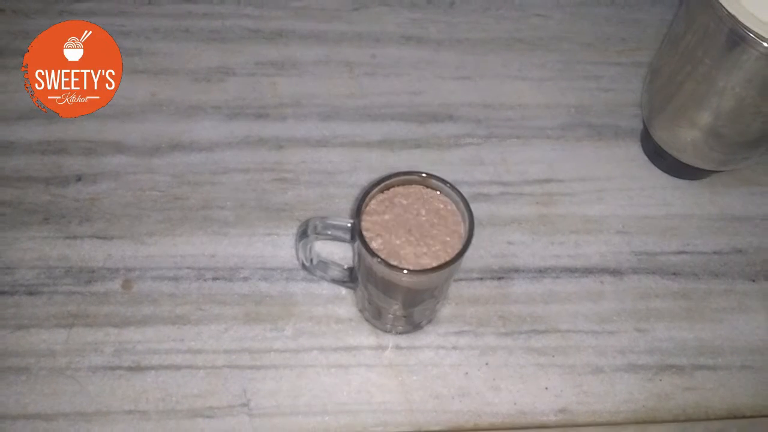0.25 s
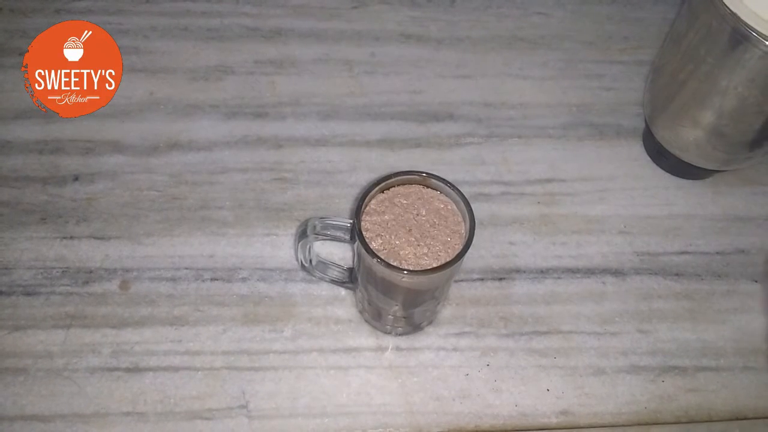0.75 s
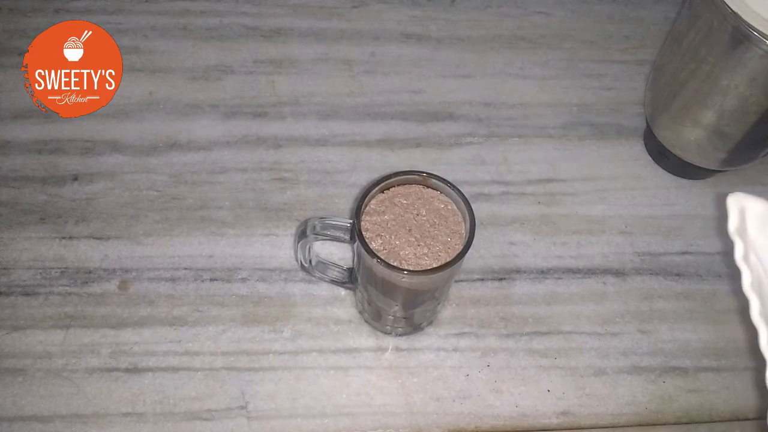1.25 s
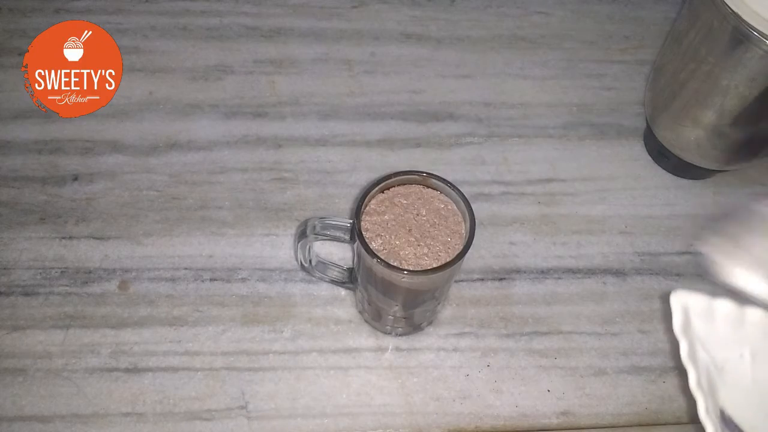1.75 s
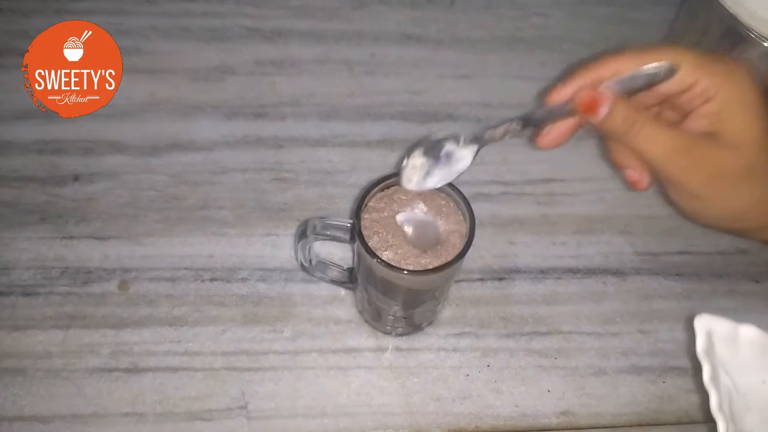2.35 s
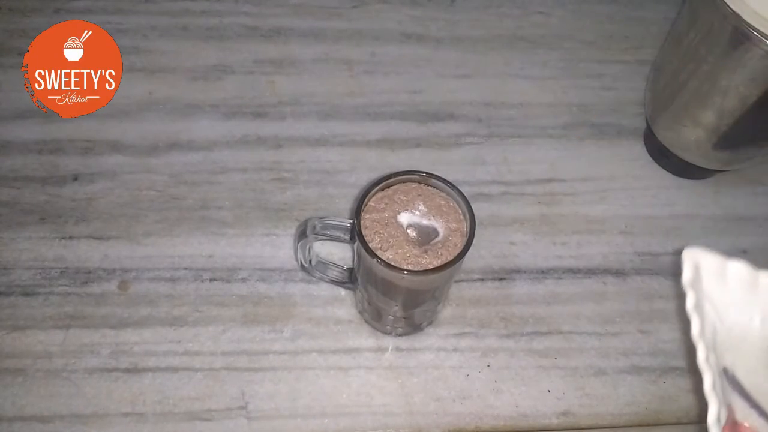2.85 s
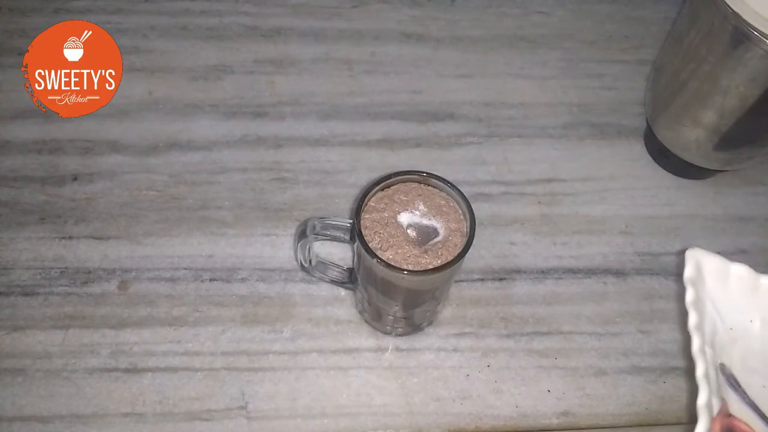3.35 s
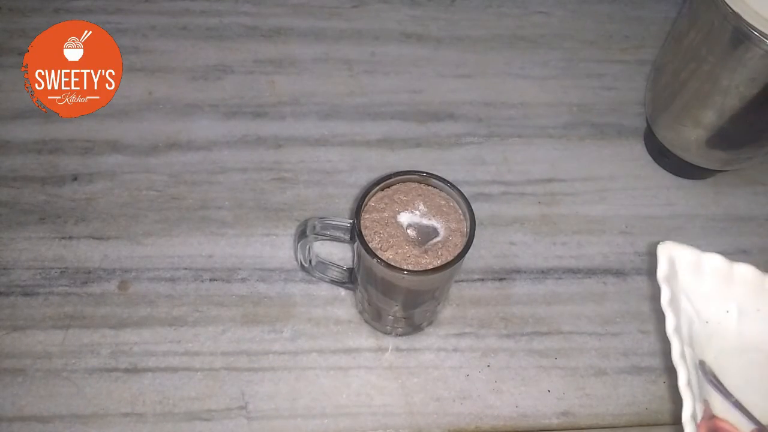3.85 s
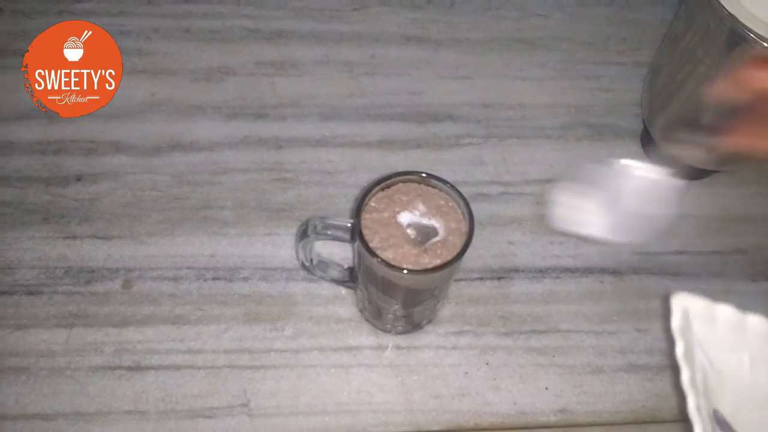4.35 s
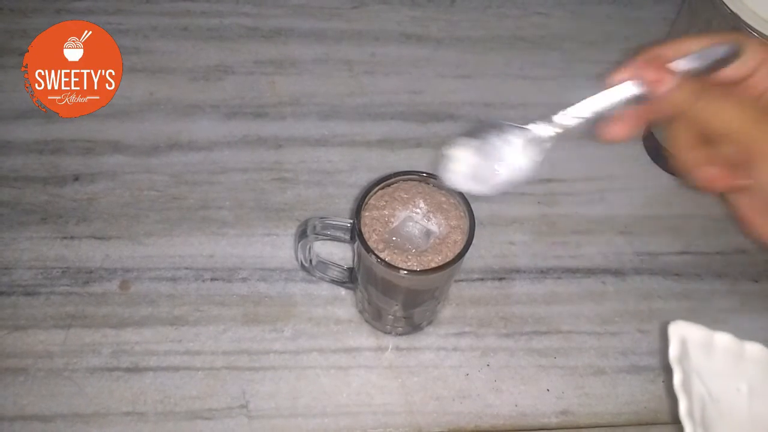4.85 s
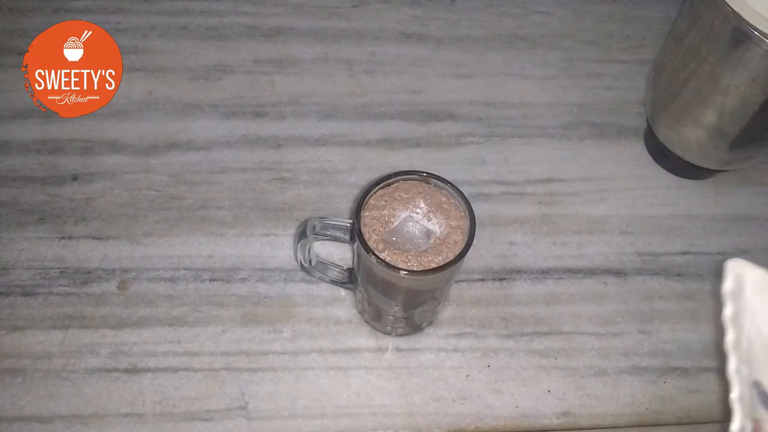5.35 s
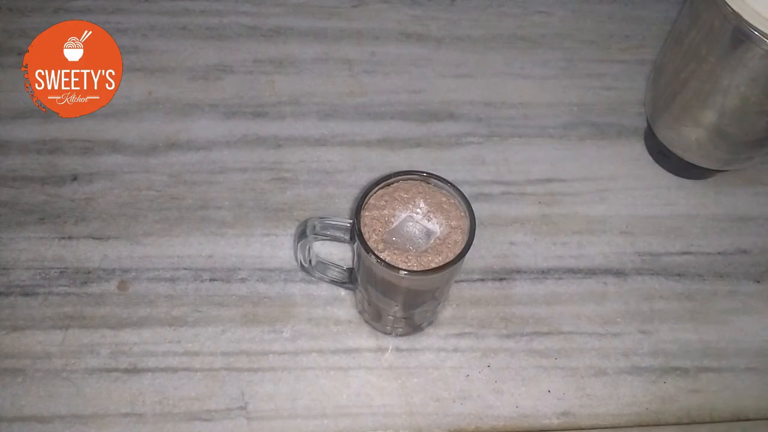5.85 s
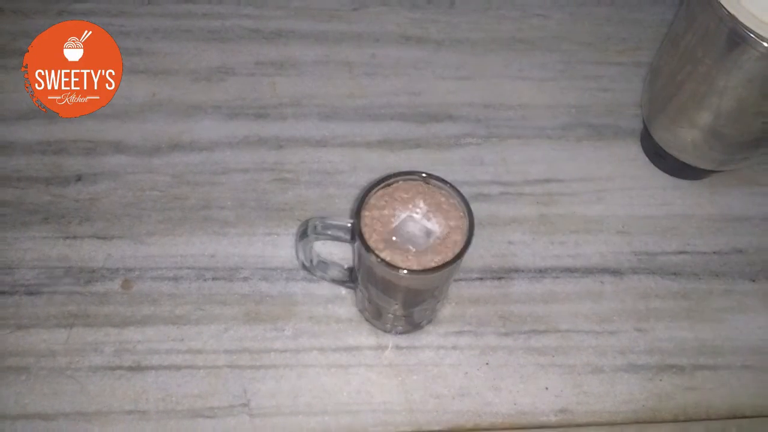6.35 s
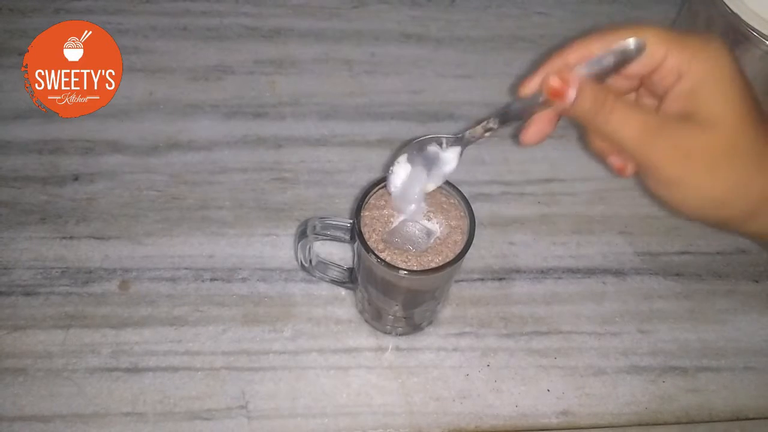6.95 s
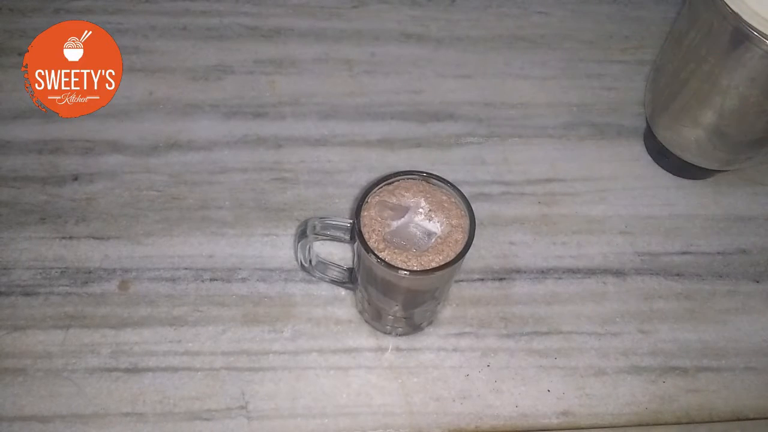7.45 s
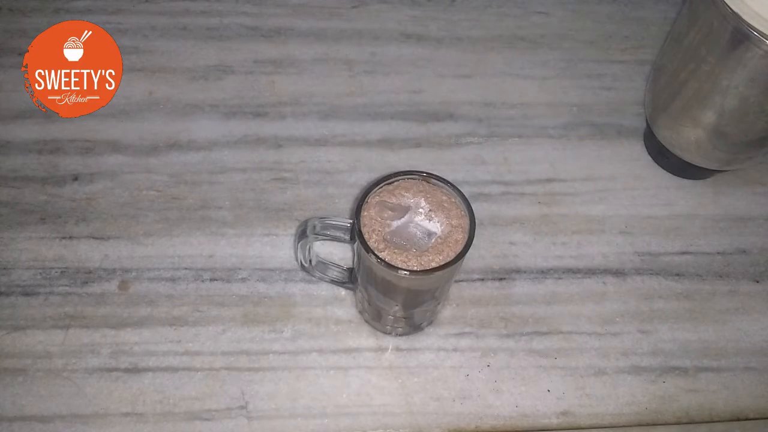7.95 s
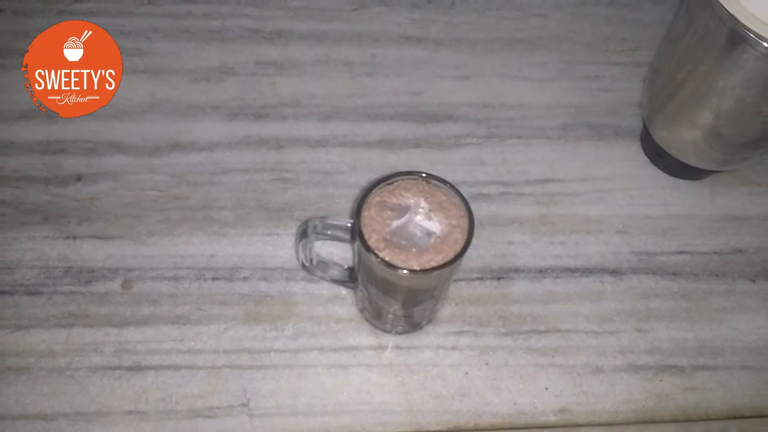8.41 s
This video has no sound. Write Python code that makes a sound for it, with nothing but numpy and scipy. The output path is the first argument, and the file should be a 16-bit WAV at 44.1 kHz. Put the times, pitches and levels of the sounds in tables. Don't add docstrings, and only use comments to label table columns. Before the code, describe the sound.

A quiet kitchen hum with faint hiss and a wavering low motor tone runs throughout. From 0 to about 1.6 s a spoon digs through ice cubes in a hard bowl: dense irregular knocks, bright snaps, grinding and very short bowl rings. Near-quiet follows, with a very soft cube drop at 2.3 s. A second busy dig runs 2.95 to 4.3 s, then a hard, dry crack at 4.63 s as a cube hits the mug, with a small rebound and low rising glug. The third dig, 5.4 to 6.5 s, opens with a strong clack and thins to scattered ticks. A third cube clicks in at 7.0 s with slight fizz. The bowl shifts softly at 7.4, lands with a sharp ringing clack at 7.75, the spoon taps at 8.22, and a rough slide fades toward 8.6 s. Close, wide stereo with a short room tail.

```python
import sys
import numpy as np
from scipy import signal
from scipy.fft import rfft, irfft, next_fast_len
from scipy.io import wavfile

SR = 44100
rng = np.random.default_rng(int(sys.argv[2]) if len(sys.argv) > 2 else 0)


def magnitude_from_level(level_db):
    exponent = np.asarray(level_db, float) / 20
    return 10 ** exponent


def unload_audio(sound):
    columns = np.transpose(np.atleast_2d(sound))
    steps = np.round(np.clip(columns, -1, 1) * 32767)
    wavfile.write(sys.argv[1], SR, steps.astype(np.int16))


N = 382788

EDGES = 30 * 2 ** np.arange(0, 9.2, .5)


def at_hz(points, hz):
    return np.interp(np.log(hz), np.log(np.array(points)[:, 0]), np.array(points)[:, 1])


def in_time(tables):
    t, out = np.arange(N) / SR, -150.
    for rows in tables:
        s, *columns = np.transpose(rows)
        out = np.maximum(out, [np.interp(t, s, c, -150, -150) for c in columns])
    return out


def band(x, low_hz, high_hz):
    return signal.sosfilt(signal.butter(2, [low_hz, min(high_hz, .45 * SR)], "band", fs=SR, output="sos"), x)


def drift(rate):
    knots = rng.standard_normal(400)
    return np.interp(np.arange(N) / SR * rate, np.arange(400), knots)


def shifting(per_s, count):
    weights = np.array([drift(per_s) for _ in range(count)])
    return weights / np.sqrt(np.sum(weights ** 2, axis=0))


def coloured(tone, alike):
    size = next_fast_len(N)
    shared, *own = rng.standard_normal((3, size))
    white = np.sqrt(alike) * shared + np.sqrt(1 - alike) * np.array(own)
    gain = magnitude_from_level(at_hz(tone, np.fft.rfftfreq(size, 1 / SR) + 1))
    out = irfft(rfft(white) * gain, size)[:, :N]
    return out / np.sqrt(np.mean(out ** 2))


def clicks_at(seconds, gains):
    out = np.zeros(N)
    np.add.at(out, np.round(np.asarray(seconds) * SR).astype(int), gains)
    return out


def ring(clicks, hz, t60):
    r, w = magnitude_from_level(-60 / (t60 * SR)), 2 * np.pi * hz / SR
    return signal.lfilter([0, np.sin(w)], [1, -2 * r * np.cos(w), r * r], clicks + 1e-18)


def dying(blows, t60):
    return signal.lfilter([1], [1, -magnitude_from_level(-60 / (t60 * SR))], blows + 1e-18)


def lagged(x, lag_s, tone=((10, 0), (20000, 0)), slant=1):
    size = next_fast_len(N + 64)
    hz = np.fft.rfftfreq(size, 1 / SR)
    turn = np.exp(-2j * np.pi * hz * lag_s) * magnitude_from_level(slant * at_hz(tone, hz + 1))
    return irfft(rfft(x, size) * turn, size)[..., :N]


def small_contacts(per_s, spread_db):
    sizes = magnitude_from_level(spread_db * np.minimum(rng.exponential(1, N), 4)) * rng.choice([-1, 1], N)
    grains = sizes * (rng.random(N) < per_s * magnitude_from_level(5 * drift(30)) / SR)
    return grains / np.sqrt(np.mean(grains ** 2))


def bowl_modes(knock_s, share_db, luck, rubbing):
    # pitch_hz, level_db, t60_s
    modes = [(482.7, -1, 0.11), (809.4, 2, 0.087), (891.3, -0.5, 0.089), (971, -3, 0.095),
             (1112, -2.5, 0.041), (1154.5, 2.5, 0.099), (1280, -4, 0.063), (1600, 3.5, 0.035),
             (1757, 8, 0.037), (1836, 9, 0.057), (2520, 10.5, 0.046), (3460, 6.5, 0.03), (3650, 4, 0.037),
             (3840, 2, 0.016)]
    mode_spread_db, loss_cycles = 4.5, 200
    out = 0
    for k, (hz, level_db, t60) in enumerate(modes):
        blow_db = share_db(hz) - 16.5 + mode_spread_db * luck[:, 20 + k]
        blows = clicks_at(knock_s, magnitude_from_level(blow_db) * np.sign(luck[:, 39 - k]))
        drive = blows + np.roll(rubbing, 37 * k)
        out = out + magnitude_from_level(level_db) * ring(drive, hz, min(t60, loss_cycles / hz))
    return out


def ice_in_bowl():
    # start_s, peak_db, body_share_db, drag (0-1)
    first_dig = [(0.043, -36.5, -33, 0.03), (0.066, -35, -37, 0.94), (0.11, -16.5, -12.5, 0.38),
                 (0.139, -14.5, -23, 0.9), (0.162, -8, -14.5, 0.24), (0.225, -14, -29.5, 0.06),
                 (0.252, -14, -13.5, 0.72), (0.316, -17.5, -5, 0.22), (0.354, -13.5, -25, 0.85),
                 (0.442, -17, -3.5, 0.66), (0.51, -22, -21, 0.14), (0.617, -19, -34.5, 0.45),
                 (0.65, -15, -16, 0.19), (0.679, -26.5, 0.5, 0.43), (0.714, -23, -4.5, 0.84),
                 (0.778, -38.5, 10, 0.3), (0.841, -19.5, -6, 0.7), (0.863, -5, -12, 0.59),
                 (0.943, -15, -1, 0.35), (1.011, -17, -20, 0.42), (1.026, -10.5, -13, 0.02),
                 (1.064, -17.5, -12, 0.3), (1.109, -43, -19, 0.8), (1.209, -20, -13.5, 0.46),
                 (1.253, -22, -12.5, 0.66), (1.291, -16.5, -11.5, 0.75), (1.32, -10.5, -15, 0.2),
                 (1.367, -28, -23, 0.4), (1.504, -27, -17, 0.26), (1.601, -39, -32, 0.27)]
    second_dig = [(2.954, -13.5, -1.5, 0.28), (2.98, -17, -15, 0.65), (3.002, -16, -5.5, 0.25),
                  (3.036, -18, -2.5, 0.083), (3.069, -25.5, 4.5, 0.74), (3.129, -18, -5, 0.14),
                  (3.179, -23, -5, 0.41), (3.214, -20, -4, 0.57), (3.244, -17.5, -3.5, 0.23),
                  (3.263, -19, -16, 0.56), (3.296, -14.5, -8, 0.43), (3.317, -9, -10.5, 0.11),
                  (3.374, -23.5, -4, 0.67), (3.465, -23.5, -3.5, 0.26), (3.473, -15, -8, 0.42),
                  (3.494, -10.5, -16, 0.26), (3.526, -12.5, -10, 0.25), (3.565, -9, -14, 0.44),
                  (3.64, -18.5, -5, 0.31), (3.678, -23.5, -25.5, 0.64), (3.761, -25, -8, 0.26),
                  (3.768, -23.5, -24, 0.7), (3.812, -22, -12.5, 0.64), (3.959, -24, -15, 0.33),
                  (3.988, -11, -10, 0.75), (4.006, -9, -20.5, 0.2), (4.095, -21.5, -9, 0.42),
                  (4.109, -14, -9, 0.12), (4.163, -39, -3, 0.39), (4.466, -21.5, -17, 0.56)]
    third_dig = [(5.374, -14, -10, 0.55), (5.401, -14, -12.5, 0.44), (5.434, -29, -3, 0),
                 (5.4506, -12, -7.5, 0.31), (5.572, -24.5, -7.5, 0.0046), (5.6, -27, -24, 0.7),
                 (5.702, -30, -9, 0.14), (5.724, -26.5, -38, 0.19), (5.745, -22, -32, 0.43),
                 (5.766, -10.5, -21, 0.22), (5.836, -20, -16, 0.43), (5.868, -22, -16, 0.008),
                 (5.897, -26, -26, 0.24), (5.929, -40, -12, 0.3), (5.953, -33.5, -4.5, 0.096),
                 (6.1, -25, -7, 0.89), (6.107, -21, -13.5, 0.22), (6.16, -15.5, -15.5, 0.81),
                 (6.235, -24.5, -7, 0.51), (6.255, -25, -9, 0.66), (6.505, -35, -15, 0.3),
                 (6.536, -28, -13, 0.46), (6.838, -34.5, -7, 0.61), (6.906, -27.5, -16.5, 0.25)]
    put_away = [
        (7.587, -23.5, -12.5, 0.41),
        (7.7447, -9.5, -11.5, 0.44),
        (8.028, -31.5, -11, 0.9),
        (8.085, -41, -1, 0.28),
        (8.117, -35, -26, 0.26),
        (8.225, -18.5, -26, 0.44),
    ]
    further_knocks = [(0.19, -15, -7.5, 0.52), (0.385, -15.5, -5, 0.35), (0.411, -15.5, -5.5, 0.31),
                      (0.885, -17, -5, 0.22), (0.916, -10.5, -11, 0.3), (0.928, -16, -19, 0.24),
                      (0.959, -14.5, -19, 0.26), (1.126, -22.5, -14, 0.22), (1.345, -22.5, -6, 0.17),
                      (1.471, -35, -18, 0.56), (1.714, -41, -9, 0.39), (1.853, -37.5, -9.5, 0.58),
                      (3.105, -17, -11, 0.49), (3.152, -27.5, -1, 0.27), (3.342, -45, -17, 0.34),
                      (3.552, -18.5, -16, 0.48), (3.594, -29, -20, 0.44), (3.848, -27.5, -11, 0.34),
                      (4.051, -32, -1, 0.45), (4.208, -31.5, -0.5, 0.56), (4.288, -38.5, 2.5, 0.59),
                      (6.264, -16.5, -17, 0.28), (6.862, -42, -9, 0.33)]
    # time_s, grinding_db
    pressure = [
        [(0.0, -38.5), (0.144, -39), (0.278, -29.5), (0.31, -33), (0.712, -39), (0.842, -41.5), (1.176, -49.5),
         (1.578, -53), (1.62, -65)],
        [(2.95, -45), (3.004, -37), (3.126, -37), (3.484, -34), (3.644, -43), (3.794, -51), (4.012, -41),
         (4.288, -54), (4.58, -50.5)],
        [(5.46, -42), (5.548, -35), (5.716, -34), (5.91, -43), (6.186, -43.5), (6.342, -51), (6.586, -65),
         (6.932, -49.5), (6.97, -48.5)],
        [(7.75, -34.5), (7.848, -44), (7.962, -50), (8.102, -43.5), (8.3, -46.5)],
    ]
    share_hz = [1176, 3150, 8140]
    # pitch_hz, t60_s
    crack_t60 = [(500, 0.0052), (1500, 0.016), (4000, 0.013), (12000, 0.033)]
    # pitch_hz, level_db (per half octave)
    knock_tone = [(400, -16), (900, -9), (1800, -1.5), (2500, 3.5), (4000, 4.5), (6300, 1), (9500, -8),
                  (12900, -15.5)]
    blow_delay_s, tick_db = .0008, 18
    settle_db, settle_t60_s = -22.5, 0.11
    base_share_db, share_per_body, top_spread_db = [2.5, -18.5, -21], [1, -0.46, -0.17], 1.5

    rows = np.concatenate([first_dig, second_dig, third_dig, put_away, further_knocks])
    rows = rows + [blow_delay_s, 0, 0, 0]
    knock_s, peak_db, body_share_db, drag = rows.T
    drag = np.clip(drag, 0, 1)
    luck = rng.standard_normal((len(rows), 40))

    settling = dying(clicks_at(knock_s, magnitude_from_level(peak_db + settle_db)), settle_t60_s)
    body_db = 20 * np.log10(magnitude_from_level(in_time(pressure)[0] + 2.0) + settling + 1e-8)
    bright_db = -0.1 + 0.85 * body_db
    grains = small_contacts(per_s=1500, spread_db=3.8)
    white = rng.choice([-1., 1.], (2, N))
    stutter = small_contacts(per_s=680, spread_db=-2.5)

    shares = base_share_db + np.outer(body_share_db, share_per_body)
    shares[:, 2] += top_spread_db * luck[:, 19]

    def share_db(hz):
        return peak_db + np.array([at_hz(np.c_[share_hz, share], hz) for share in shares])

    out = 0
    for k, (low, high) in enumerate(zip(EDGES[7:], EDGES[8:])):
        hz = np.sqrt(low * high)
        strength = magnitude_from_level(share_db(hz) + 2.36 * luck[:, k])
        t60 = at_hz(crack_t60, hz)
        crack = dying(clicks_at(knock_s, strength * (1 - drag) ** 2), 0.5 * t60)
        rasp = dying(clicks_at(knock_s, strength * drag * 0.51), 7.73 * t60)
        burst = crack * white[k % 2] + rasp * (0.5 * white[k % 2] + 0.77 * stutter)
        tick = clicks_at(knock_s, strength * (1 - drag) ** 4 * magnitude_from_level(tick_db))
        lift = np.clip(np.log2(hz / 1500) / 0.48, 0, 1)
        grind = magnitude_from_level((1.5 - lift) * body_db + lift * bright_db - 5.0) * grains
        even = np.sqrt(SR / 2 / (high - low))
        gain = (-1) ** k * even * magnitude_from_level(at_hz(knock_tone, hz))
        out = out + gain * band(magnitude_from_level(4.0) * burst + tick + grind, low, high)
    rubbing = magnitude_from_level(body_db - 40.0) * grains
    out = out + bowl_modes(knock_s, share_db, luck, rubbing)
    return band(out, 150, 23000)


def snaps():
    # start_s, peak_db, top_share_db
    edge_snaps = [(0.069, -37, -23), (0.1087, -31, -29), (0.1381, -33, -18), (0.161, -42, -21),
                  (0.2263, -11.5, -30), (0.3157, -33, -17), (0.354, -21, -22), (0.3721, -18, -20),
                  (0.4564, -19, -19), (0.5891, -30, -25), (0.6085, -25, -20), (0.618, -28, -27),
                  (0.6514, -46, -21), (0.8644, -30, -23), (0.8689, -30, -25), (0.9624, -13.5, -32),
                  (1.0116, -27, -19), (1.0264, -8.5, -20), (1.064, -15.5, -25), (1.1104, -18.5, -29),
                  (1.2084, -26, -26), (1.2531, -25, -20), (1.291, -25, -11), (1.321, -8, -24),
                  (1.3678, -16, -35), (2.295, -38, -15), (2.954, -28, -13), (2.9801, -22, -24),
                  (3.0021, -26, -12), (3.0365, -14.5, -15), (3.1053, -46, -30), (3.1278, -29, -25),
                  (3.2186, -26, -16), (3.2434, -11, -25), (3.263, -16.5, -13), (3.2955, -15, -24),
                  (3.3179, -18, -12), (3.373, -25, -31), (3.4745, -28, -16), (3.494, -16.5, -20),
                  (3.5274, -29, -18), (3.5558, -29, -14), (3.5665, -17, -22), (3.6396, -41, -11),
                  (3.64, -17.5, -18), (3.679, -22, -28), (3.7594, -33, -21), (3.7688, -43, -29),
                  (3.7688, -42, -28), (3.8132, -32, -27), (3.9594, -40, -15), (3.992, -26, -19),
                  (4.0078, -20, -20), (4.0971, -38, -22), (4.112, -28, -22), (4.4662, -38, -22),
                  (4.51, -36, -20), (4.6266, -12.5, -18), (5.377, -42, -23), (5.3998, -36, -23),
            (5.4499, -6.5, -23), (5.574, -22.5, -30), (5.5986, -28, -24), (5.674, -21, -20),
            (5.7226, -30, -20), (5.751, -28, -15), (5.765, -24, -24), (5.836, -23, -34), (5.8972, -35, -24),
            (6.045, -34, -25), (6.0942, -45, -11), (6.1062, -31, -23), (6.1617, -21, -27),
            (6.2633, -26, -15), (6.2633, -26, -15), (6.5073, -38, -20), (6.5345, -35, -22),
            (6.907, -34, -25), (6.997, -8.5, -24), (7.588, -36, -18), (7.745, -2.5, -20),
            (8.0273, -47, -18), (8.2234, -52, -15), (8.2226, -25, -29), (8.3112, -43.5, -15)]
    delay_s, t60_s = 0.00057, 0.0065
    s, db, top_db = np.transpose(edge_snaps)
    out, grit = 0, rng.choice([-1., 1.], N)
    for low_hz, high_hz, level_db in [(2830, 7650, db + 5.5), (8600, 15400, db + top_db + 3)]:
        envelope = dying(clicks_at(s + delay_s, magnitude_from_level(level_db)), t60_s)
        out = -out + band(envelope * grit, low_hz, high_hz)
    return out


def clacks():
    # start_s, peak_db, thump_hz
    blows = [(0.151, -19, 1810), (0.162, -19, 1780), (0.378, -14, 1200), (0.443, -13, 883),
             (0.466, -20, 791), (0.692, -27, 1250), (0.862, -18.5, 1290), (0.875, -9, 1810),
             (0.908, -13, 840), (0.938, -9.5, 848), (0.946, -6.5, 1170), (1.027, -14.5, 1280),
             (3.037, -8.5, 896), (3.318, -7, 1800), (3.496, -28, 1840), (3.509, -29, 953),
             (3.528, -28, 961), (3.566, -25, 1810), (3.585, -17, 1740), (3.965, -21.5, 1670),
             (3.989, -12.5, 1330), (4.111, -14.5, 1160), (5.414, -19, 1170), (5.45, -10, 1200),
             (6.952, -41, 813), (7.02, -24, 883), (7.743, -11.5, 1110)]
    # start_s, peak_db
    ticks = [(0.043, -27), (0.0683, -18), (0.1082, -11), (0.1407, -14), (0.1626, -4), (0.2275, -10),
             (0.2514, -8), (0.3187, -9), (0.3546, -14), (0.618, -22), (0.619, -6), (0.65, -19),
             (0.844, -20), (0.863, -11), (1.0117, -11), (1.0264, -4), (1.0645, -17), (1.208, -24),
             (1.2536, -23), (1.2915, -19), (1.3214, -9), (1.5045, -30), (1.6008, -35), (2.2944, -32),
             (2.954, -31), (3.037, -24), (3.1054, -15), (3.127, -12), (3.2436, -11), (3.262, -18),
             (3.296, -23), (3.3179, -13), (3.4636, -24), (3.4745, -14), (3.494, -8), (3.5274, -16),
             (3.556, -17), (3.6793, -16), (3.7694, -26), (3.7694, -23), (3.813, -23), (3.9609, -29),
             (3.9889, -13), (4.0085, -4)]
    thump_cycles = 2.7
    s, db, _ = np.transpose(blows)
    thumps = sum(ring(clicks_at([a], magnitude_from_level(b + 1.5)), hz, thump_cycles / hz) for a, b, hz in blows)
    tick_s, tick_db = np.transpose(ticks)
    edge = clicks_at(s, magnitude_from_level(db - 2.5)) + clicks_at(tick_s + .0008, magnitude_from_level(tick_db - 0.5))
    bright = ring(edge, 3600, 0.0018) - magnitude_from_level(-12.5) * ring(edge, 6500, 0.00046)
    bright = bright + magnitude_from_level(-18) * ring(edge, 11500, 0.00032)
    return band(thumps + bright, 470, 18000)


def drops():
    # start_s, crack_db, froth_db (under the crack), glug_db, glug_hz
    cubes = [
        (2.2958, -25.5, -12, -64, 244),
        (4.6282, 3, -37, -35.5, 236.5),
        (4.637, -13, -37, -39, 233),
        (6.993, -18, -33, -60, 240),
        (6.998, -3, -34, -39.5, 229.7),
        (7.022, -44, -1, -44.5, 234),
    ]
    s, crack_db, froth_db, glug_db, glug_hz = np.transpose(cubes)
    blows = clicks_at(s, magnitude_from_level(crack_db))
    out = magnitude_from_level(2.5) * ring(blows, 4600, .0013)
    out += magnitude_from_level(-14) * ring(blows, 2500, .0015) + magnitude_from_level(-24) * ring(blows, 1300, .003)
    out += magnitude_from_level(-8.0) * ring(blows, 6700, 0.00098) + magnitude_from_level(-14) * ring(blows, 12000, 0.0006)
    froth = dying(clicks_at(s, magnitude_from_level(crack_db + froth_db)), 0.15) * rng.standard_normal(N)
    out += band(band(froth, 700, 9000), 700, 9000)
    age = np.arange(SR // 2) / SR
    swell = (1 - np.exp(-age / .005)) ** 2 * magnitude_from_level(-60 * age / .23)
    for at_s, db, hz in zip(s, glug_db, glug_hz):
        start = round(at_s * SR)
        glug = np.sin(2 * np.pi * hz * age * (1 + 0.39 * age))
        out[start:start + len(age)] += magnitude_from_level(db + 12.5) * swell * glug
    return out


def set_down():
    # start_s, pitch_hz, level_db, t60_s
    rings = [(7.7475, 3620, -12, 0.046), (7.7475, 3480, -23, 0.033), (7.7445, 4050, -22, .02),
             (7.7445, 1070, -18, 0.074), (7.7625, 1400, -23, .04), (7.7485, 840, -27.5, 0.1),
             (8.2243, 3100, -18, 0.0073), (8.2268, 3350, -15, 0.015), (8.229, 3230, -29, 0.092),
             (8.2275, 1820, -30, 0.091), (5.4545, 5400, -22, .06), (5.452, 830, -21, 0.07),
             (5.452, 2100, -24.5, .05)]
    square_blows = [
        (5.4501, 1150, -3, .0045),
        (5.4501, 3600, -9, .003),
        (7.7442, 1100, -8, .004),
        (1.0276, 3600, -10, .002),
    ]
    return sum(ring(clicks_at([s], magnitude_from_level(db)), hz, t60) for s, hz, db, t60 in rings + square_blows)


def bowl_slides():
    # start_s, hold_s, level_db
    pushes = [
        (7.4, 0.043, -44.5),
        (8.264, 0.12, -35),
        (0.42, 0.054, -35.5),
        (7.79, 0.026, -44.5),
        (7.4, 0.015, -49),
    ]
    # pitch_hz, level_db (per Hz)
    slide_tone = [(400, -16), (1000, -10.5), (1800, -0.5), (3000, 0.5), (5000, -1), (8000, -4),
                  (12000, -14), (15300, -19), (15800, -43)]
    attack_s, release_s, depth_db = 0.059, 0.18, 25
    strokes = []
    for s, hold, db in pushes:
        full = s + attack_s
        strokes.append([(s, db - depth_db), (full, db), (full + hold, db),
                        (full + hold + release_s, db - depth_db)])
    return magnitude_from_level(in_time(strokes)[0] + 1.7 * drift(40)) * coloured(slide_tone, alike=0.026)


def at_ports(x, far_db, lag_s, scatter_db):
    # pitch_hz, level_db
    shade = [(300, 8), (700, -6.5), (1200, -25.5), (2500, -13), (8000, -22)]
    scatter = 0
    for weight in shifting(per_s=22, count=6):
        path = band(rng.standard_normal(160), 900, 16000) * magnitude_from_level(-60 * np.arange(160) / 200)
        path = path / np.sqrt(np.sum(path ** 2))
        scatter = scatter + signal.oaconvolve(weight * x, path)[:N]
    return np.array([x, magnitude_from_level(far_db) * lagged(x, lag_s, shade) + magnitude_from_level(scatter_db) * scatter])


def room(x):
    # pitch_hz, t60_s
    room_t60 = [(200, 0.42), (1000, 0.37), (4000, 0.3), (12000, 0.22)]
    # pitch_hz, share (0-1)
    room_alike = [(200, 1), (700, 0.78), (1500, 0.13), (4000, 0.044)]
    size, tail = 20000, 0
    age = np.arange(size) / SR
    for low, high in zip(EDGES[4::2], EDGES[6::2]):
        hz = np.sqrt(low * high)
        fade = magnitude_from_level(-60 * age / at_hz(room_t60, hz)) * (1 - np.exp(-age / 0.00028))
        shared, *own = band(rng.standard_normal((3, size)), low, high)
        alike = np.clip(at_hz(room_alike, hz), 0, 1)
        tail = tail + (np.sqrt(alike) * shared + np.sqrt(1 - alike) * np.array(own)) * fade
    tail = tail / np.sqrt(np.sum(tail ** 2) / 2)
    return signal.fftconvolve(x[None], tail, axes=1)[:, :N]


def background():
    # time_s, level_db
    kitchen = [(0.0, -53), (0.41, -59), (0.87, -54), (1.04, -69), (1.59, -64.5), (2.51, -56.5), (3.14, -54),
               (3.29, -59), (3.58, -64.5), (4.59, -55.5), (4.81, -65.5), (5.78, -64.5), (6.96, -57.5),
               (7.13, -66), (7.86, -63), (8.68, -54)]
    # pitch_hz, level_db (per Hz)
    hum_tone = [(25, -19), (50, -13), (80, 1.5), (120, 2.5), (250, -4.5), (400, -7.5), (700, -17.5),
                (1200, -37.5)]
    hiss_tone = [(150, 0.5), (300, 2.5), (700, -0.5), (1500, -4), (3300, -2), (5000, -10), (9000, -12.5),
                 (15300, -27), (15800, -44)]
    motor_hz, motor_db, hum_db, hiss_level_db = 369, -9, 7.5, -55.5
    swell_db, = in_time([kitchen])
    motor_level = magnitude_from_level(motor_db + 1.0 * drift(3.5))
    motor = motor_level * np.sin(2 * np.pi * np.cumsum(motor_hz + 1.32 * drift(1.587)) / SR)
    hum = magnitude_from_level(1.54 * drift(21.0)) * coloured(hum_tone, alike=0.69) + motor * [[.9], [1.2]]
    hiss_db = hiss_level_db + 0.9 * (swell_db - swell_db.mean())
    return magnitude_from_level(swell_db + hum_db) * hum + magnitude_from_level(hiss_db) * coloured(hiss_tone, alike=0.082)


def scene():
    bowl, mug, edges = ice_in_bowl(), drops(), snaps()
    hard = band(set_down(), 476, 19000) + clacks()
    near = at_ports(bowl + edges, far_db=-3.0, lag_s=-0.00008, scatter_db=-5.0)
    near = near + at_ports(mug, far_db=-14, lag_s=.00009, scatter_db=-40)
    near = near + at_ports(hard, far_db=-5.0, lag_s=-0.000046, scatter_db=-11)
    sent = bowl + magnitude_from_level(-2.5) * edges + magnitude_from_level(-9.5) * band(mug, 140, 8200) + magnitude_from_level(-6.0) * hard
    tails = sum(room(weight * sent) for weight in shifting(per_s=12, count=3))
    return near + magnitude_from_level(-9.0) * tails + bowl_slides() + background()


def band_limit(x):
    return signal.sosfilt(signal.butter(12, 16500, fs=SR, output="sos"), x)


def record(dry):
    # pitch_hz, level_db
    cross_tone = [(100, -2.5), (1200, -2), (2500, -3.4), (5000, -5), (7500, -5.5), (9500, -9), (15000, -30)]
    # pitch_hz, level_db
    left_over_right = [(60, 1.1), (300, -2), (800, -3.5), (1600, -1.5), (4000, -1.8), (8300, -0.5),
                       (10500, -5), (14500, -8.5)]
    port_delay_s, top_hz = 0.0004, 15400
    wide = dry - lagged(dry[::-1], port_delay_s, cross_tone)
    wide = lagged(wide, 0, left_over_right, slant=np.array([[.5], [-.5]]))
    rounded = 1.05 * np.tanh(wide / 1.05)
    cut = signal.sosfilt(signal.cheby1(8, 1, top_hz, fs=SR, output="sos"), rounded)
    return band_limit(cut)


dry = scene()
out = record(dry)
unload_audio(out)
```